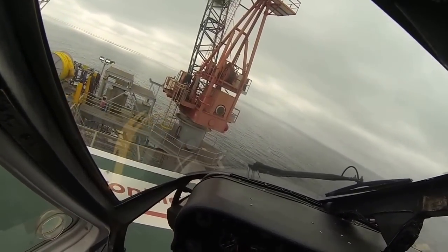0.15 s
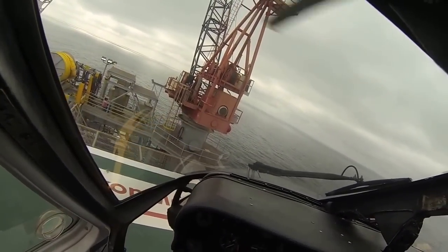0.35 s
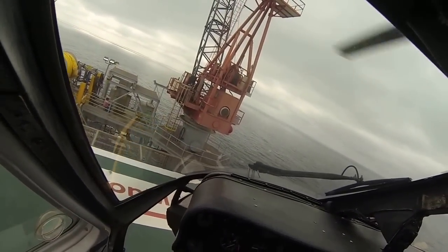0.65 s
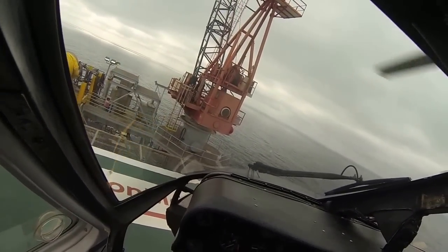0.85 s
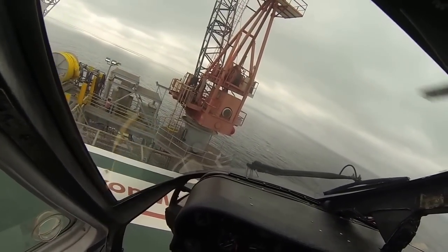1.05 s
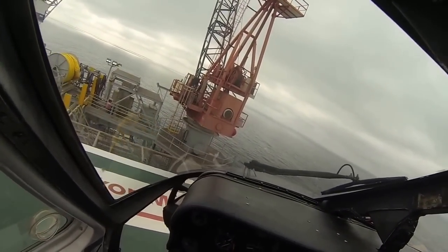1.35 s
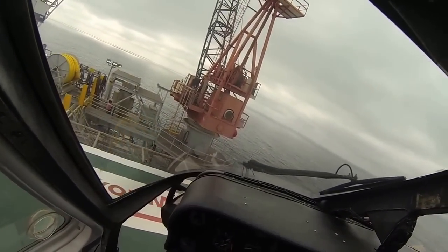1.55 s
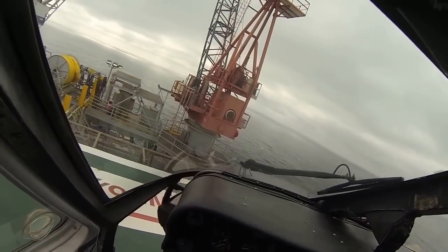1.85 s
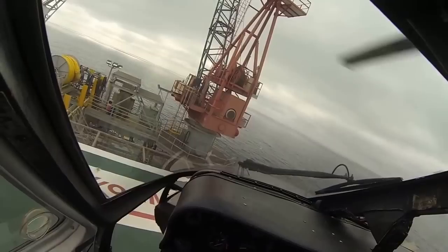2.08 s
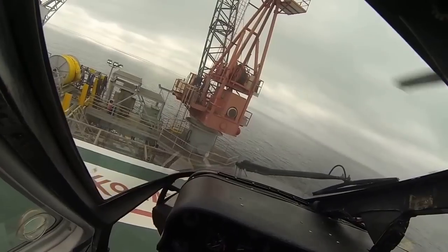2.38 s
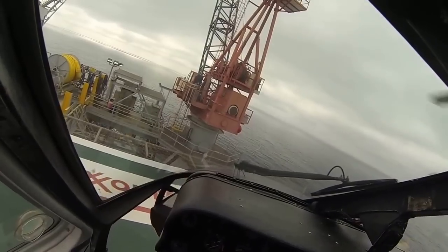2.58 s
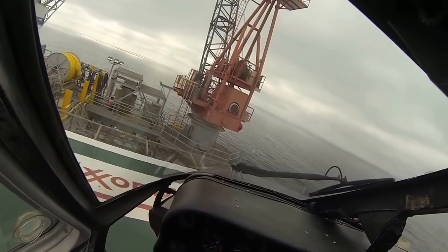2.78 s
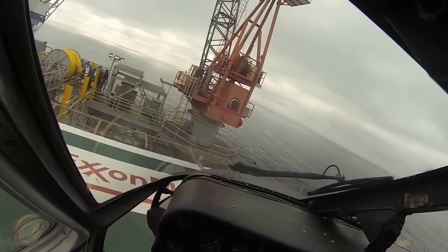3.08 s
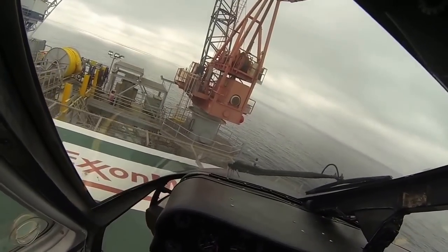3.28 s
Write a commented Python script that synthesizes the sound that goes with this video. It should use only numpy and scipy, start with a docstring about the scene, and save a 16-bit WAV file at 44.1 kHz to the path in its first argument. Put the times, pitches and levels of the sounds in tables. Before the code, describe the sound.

A helicopter drones steadily inside its cockpit for about 3.4 seconds, without starting or stopping. A loud, pure gearbox whine rises very slightly until 2 s, then holds, quivering with the rotor over lower gear hums. Deep buffeting swells unevenly, strongest near 1.3 s, beneath boomy cabin noise and ringing panels. A thin, faint turbine whistle sits on top. Soft sizzles come and go; small dry ticks cluster around 1.8-2.3 s and near the end.

```python
"""Inside the cockpit of a helicopter hovering by an offshore deck. The main gearbox whines in pure tones
that throb with the rotor. Shaped noise makes the cabin boom, the deep buffeting and the ringing panels,
and a narrow, wavering band of noise makes the thin turbine whistle. Now and then the trim ticks (short
fading bursts) and something sizzles faintly with the vibration (soft swells of grainy noise)."""
import sys
import numpy as np
from scipy import signal
from scipy.fft import rfft, irfft
from scipy.io import wavfile

SR = 44100
rng = np.random.default_rng(int(sys.argv[2]) if len(sys.argv) > 2 else 0)


def log_audio(samples):
    """Write samples as a 16-bit WAV file to the path given in sys.argv[1]."""
    # one column per channel
    frames = np.atleast_2d(samples).T
    # limit to full scale, then quantise
    limited = np.clip(frames, -1, 1)
    pcm = np.round(limited * 32767).astype(np.int16)
    wavfile.write(sys.argv[1], SR, pcm)


N = 151263  # length of the sound in samples

# Speed of the drive train, told as the pitch of the loudest gear tone: (time [s], pitch [Hz])
WHINE_PITCH = [(0, 1209), (.4, 1212.6), (.85, 1214.5), (1.4, 1217.3), (2.05, 1221.3), (2.5, 1220),
               (3.43, 1220.2)]
# Loudness of that tone: (time [s], level [dB])
WHINE_LEVEL = [(0, -24), (.8, -26), (1.3, -25), (1.9, -23), (2.6, -25.6), (3.4, -26)]
# Shafts that make it throb: (rate [Hz at normal speed], depth [0-1])
WHINE_THROB = [(9.7, .12), (19.4, .06), (38.6, .1), (71.6, .14)]
# Harmonics of the main gear mesh; a negative fade makes a harmonic quietest at its turning time:
# (multiple, level at the turn [dB], turning time [s], fade either side [dB per s], throb [0-1])
MESH_HARMONICS = [(1, -39.5, 0.97, 2.53, 0.23), (2, -36.5, 3.9, 0.5, 0.2), (3, -39.5, 2.4, 3, 0.03),
                  (4, -46, 1.8, -0.1, .13), (5, -49.5, 0.33, 1.1, 0.2), (6, -55, 2.74, 3, 0.2),
                  (7, -88, 1.7, -4, 0.3), (8, -66.5, .6, 3, 0)]
# Extra level of one mesh harmonic, which dips and then flares: (time [s], level [dB])
FLARE_LEVEL = [(0, -0.5), (.55, 1.5), (.7, -5), (.9, -1), (.96, 3.5), (1.5, 3), (1.95, -1.5), (3.43, 1.5)]
# Other gears, pumps and shafts: (pitch [Hz at normal speed], level [dB])
ACCESSORY_TONES = [(107.6, -35), (131.2, -33), (467, -50.5), (882.6, -53), (1290, -44), (1570.5, -41),
                   (1944, -49), (2151, -49.5), (2437.5, -56), (2649, -51.5), (2745, -59), (3726, -55.5),
                   (4446, -65.5), (6094, -71), (7946, -87)]
# Thump of the blades: (multiple of the blade rate, level [dB])
BLADE_THUMP = [(.5, -29.5), (1, -42), (2, -43), (3, -37.5), (4, -49)]
# Tone colour of the airframe's deep buffeting: (frequency [Hz], relative level [dB])
BUFFET_COLOUR = [(12, -47.5), (24, -51.5), (39, -41.5), (49, -53), (57, -44), (68, -63), (77, -47.5),
                 (88, -62.5)]
# Loudness of the buffeting: (time [s], level [dB])
BUFFET_LEVEL = [(0, -23.5), (.2, -28.5), (.38, -24.5), (.7, -31.5), (1.1, -28), (1.3, -21), (1.5, -40.5),
                (1.7, -25.5), (1.9, -31), (2.3, -28), (2.58, -24), (2.9, -30.5), (3.2, -25), (3.43, -38)]
# Tone colour of the booming cabin air: (frequency [Hz], relative level [dB])
BOOM_COLOUR = [(92, -61), (103, -46), (114, -49), (126, -49.5), (142, -52), (162, -48.5), (190, -53.5),
               (212, -51.5), (235, -57), (310, -58), (390, -64), (490, -62.5), (560, -67.5), (680, -69.5),
               (735, -67), (850, -71.5), (1050, -76), (1400, -118)]
# Tone colour of the panels shaken by the gearbox: (frequency [Hz], relative level [dB])
PANEL_COLOUR = [(950, -91.5), (1110, -74.5), (1190, -62), (1250, -53.5), (1330, -59.5), (1400, -65.5),
                (1480, -56.5), (1620, -60), (1850, -71.5), (2030, -71), (2100, -70), (2330, -70),
                (2420, -78.5), (2580, -78), (2750, -77.5), (3000, -74), (3300, -81), (3800, -84),
                (4250, -86.5), (4700, -90.5), (5170, -83.5), (5900, -96), (7400, -96), (9800, -99.5),
                (11800, -109), (14200, -113)]
# Bursts of sizzle: (centre [s], reach either side [s], level [dB])
SIZZLES = [(.135, 0.04, -53), (.29, .05, -58), (0.342, 0.043, -45.5), (.41, .04, -49), (.51, 0.061, -48),
           (1.18, .09, -53), (1.33, 0.05, -49), (1.694, 0.099, -54), (1.832, .05, -62), (2.2, .035, -46.5),
           (2.266, 0.033, -54), (2.34, .02, -51), (2.37, 0.023, -48), (2.416, .022, -49),
           (2.513, .016, -47), (2.615, 0.014, -48), (2.703, 0.086, -53), (3.011, .025, -44.5),
           (3.065, 0.043, -54), (3.13, .02, -54), (3.41, .03, -59)]
# Tone colour of the sizzle: (frequency [Hz], relative level [dB])
SIZZLE_COLOUR = [(2500, 0), (5500, 0), (8000, -9.5), (11000, -8), (14500, -16)]
# Ticks of the trim: (start [s], level [dB])
TICKS = [(.0603, -45), (1.8165, -36.5), (1.954, -41), (1.968, -45), (2.0178, -43), (2.2755, -39),
         (3.3498, -40), (3.403, -41.5)]
# Tone colour of the ticks: (frequency [Hz], relative level [dB])
TICK_COLOUR = [(1500, -13), (2800, -4), (3800, 7), (4500, -9), (5200, 6.5), (6000, -14), (7000, -12),
               (10000, -25)]

# Pitches and rates at normal speed; all but the turbine's pitch follow the drive train.
WHINE_HZ, ROTOR_HZ, MESH_HZ = 1219.8, 4.84, 726.4
BLADES = 4
BLADE_HZ = BLADES * ROTOR_HZ
# Flutter is a random change of size (as a fraction); jitter is a random shift of phase.
WHINE_FLUTTER, WHINE_JITTER_RAD = 0.06, 0.08
MESH_FLUTTER, MESH_JITTER_RAD = 0.16, 0.2
MESH_SWING_RAD = 0.12  # phase swing of the first mesh harmonic; higher ones swing more
FLARING_MULTIPLE = 4
TONE_FLUTTER, TONE_JITTER_RAD = 0.2, 0.26
THUMP_FLUTTER, THUMP_JITTER_RAD = 0.36, 0.57
BOOM_DB, BOOM_SURGE_DB, BOOM_SURGE_HZ = -28.5, 0.68, 9.8
PANELS_DB, PANELS_THROB = -31.5, 0.092
PANELS_FOLLOW = 0.32  # dB of panel level for each dB of whine level
TURBINE_HZ, TURBINE_WIDTH_HZ, TURBINE_WAVER_HZ = 10420, 215, 60
TURBINE_DB, TURBINE_THROB = -59, 0.28
SIZZLE_GRAIN_DB, SIZZLE_THROB = 0.5, 0.28
TICK_ATTACK_S, TICK_DECAY_S = 0.001, 0.003
TICK_RING_DB, TICK_RING_S = -5, 0.012
TOP_HZ = 14700


def undb(db):
    """Turn decibels into a gain."""
    return 10 ** (np.asarray(db) / 20)


def unit(x):
    """Scale to an rms (average strength) of 1."""
    return x / np.sqrt(np.mean(x ** 2))


def curve(rows):
    """Join (time, value) rows by straight lines."""
    times, values = np.array(rows).T
    return np.interp(np.arange(N) / SR, times, values)


def noise(colour):
    """Noise of rms 1 shaped by (frequency, level) points, falling steeply outside them."""
    f = np.maximum(np.arange(N // 2 + 1) * SR / N, 1)
    hz, db = np.array(sorted(colour)).T
    shape = undb(np.interp(np.log(f), np.log(hz), db))
    ends = np.minimum(f / hz[0], 1) ** 2 * np.minimum(hz[-1] / f, 1) ** 2
    white = rfft(rng.standard_normal(N))
    return unit(irfft(white * shape * ends, N))


def walk(rate):
    """Smooth random wandering of rms 1, moving up to about rate times a second."""
    f = np.arange(N // 2 + 1) * SR / N
    smoothing = (f > 0) / (1 + (f / rate) ** 2)
    return unit(irfft(rfft(rng.standard_normal(N)) * smoothing, N))


def cycle(clock, hz):
    """A sine locked to the drive train, starting anywhere in its turn."""
    return np.sin(2 * np.pi * (hz * clock + rng.random()))


def tone(clock, hz, flutter, jitter, rate):
    """A tone of rms 1 whose size and phase shake a little."""
    size = 1 + flutter * walk(rate)
    phase = 2 * np.pi * (hz * clock + rng.random()) + jitter * walk(rate)
    return unit(size * np.sin(phase))


def whine(clock):
    """The loudest gear tone: a sine whose size throbs with the rotor and shafts."""
    throb = 1 + sum(depth * cycle(clock, hz) for hz, depth in WHINE_THROB)
    steady = tone(clock, WHINE_HZ, WHINE_FLUTTER, WHINE_JITTER_RAD, rate=20)
    return undb(curve(WHINE_LEVEL)) * unit(throb * steady)


def gearbox(clock):
    """Gear mesh harmonics that sway with the rotor as each blade twists the drive, and steadier tones."""
    t = np.arange(N) / SR
    twisted = clock + MESH_SWING_RAD * cycle(clock, BLADE_HZ) / (2 * np.pi * MESH_HZ)
    out = 0
    for multiple, db, turn, fade, throb in MESH_HARMONICS:
        # one sway for each of the first few multiples of the rotor's turning rate
        sway = 1 + throb * sum(cycle(clock, (j + 1) * ROTOR_HZ) for j in range(BLADES))
        teeth = tone(twisted, multiple * MESH_HZ, MESH_FLUTTER, MESH_JITTER_RAD, rate=50)
        flare = curve(FLARE_LEVEL) if multiple == FLARING_MULTIPLE else 0
        level = db - fade * np.abs(t - turn) + flare
        out = out + undb(level) * unit(sway * teeth)
    for hz, db in ACCESSORY_TONES:
        out = out + undb(db) * tone(clock, hz, TONE_FLUTTER, TONE_JITTER_RAD, rate=7.6)
    return out


def rotor(clock):
    """Uneven blade thump from low tones; downwash buffeting and surging cabin boom from noise."""
    thump = 0
    for multiple, db in BLADE_THUMP:
        beat = tone(clock, multiple * BLADE_HZ, THUMP_FLUTTER, THUMP_JITTER_RAD, rate=5.2)
        thump = thump + undb(db) * beat
    buffet = undb(curve(BUFFET_LEVEL)) * noise(BUFFET_COLOUR)
    boom_level = BOOM_DB + BOOM_SURGE_DB * walk(BOOM_SURGE_HZ)
    return thump + buffet + undb(boom_level) * noise(BOOM_COLOUR)


def panels(clock):
    """Dense ringing of panels: noise that partly follows the whine and swells at each blade pass."""
    drive = curve(WHINE_LEVEL)
    level = PANELS_DB + PANELS_FOLLOW * (drive - drive.mean())
    swell = 1 + PANELS_THROB * cycle(clock, BLADE_HZ)
    return undb(level) * swell * noise(PANEL_COLOUR)


def turbine(clock):
    """A compressor whistle: narrow noise that wavers quickly in pitch and is chopped by the blades."""
    pitch = TURBINE_HZ + TURBINE_WAVER_HZ * walk(rate=34)
    phase = 2 * np.pi * np.cumsum(pitch) / SR
    # two random sizes, a quarter turn apart, spread the tone into a narrow band
    whistle = unit(walk(TURBINE_WIDTH_HZ) * np.cos(phase) + walk(TURBINE_WIDTH_HZ) * np.sin(phase))
    chop = 1 + TURBINE_THROB * cycle(clock, BLADE_HZ)
    return undb(TURBINE_DB) * whistle * chop


def sizzle(clock):
    """Short soft swells of grainy noise, shaken at the blade rate."""
    t = np.arange(N) / SR
    swell = sum(undb(db) * np.exp(-2 * ((t - centre) / reach) ** 2) for centre, reach, db in SIZZLES)
    shake = 1 + SIZZLE_THROB * cycle(clock, BLADE_HZ)
    grain = undb(SIZZLE_GRAIN_DB * walk(rate=600))
    return swell * unit(shake * noise(SIZZLE_COLOUR) * grain)


def trim_ticks():
    """Dry ticks of the trim: noise that starts sharply, drops fast and rings on briefly."""
    t = np.arange(N) / SR
    knocks = 0
    for start, db in TICKS:
        age = np.maximum(t - start, 0)
        attack = np.minimum(age / TICK_ATTACK_S, 1)
        fall = np.exp(-age / TICK_DECAY_S)
        ring = undb(TICK_RING_DB) * np.exp(-age / TICK_RING_S)
        knocks = knocks + undb(db) * attack * (fall + ring)
    return knocks * noise(TICK_COLOUR)


def scene():
    """Add all the layers; one drive-train clock sets the gear tones and the rotor's rhythm."""
    # the clock counts seconds, running faster or slower with the drive train
    clock = np.cumsum(curve(WHINE_PITCH) / WHINE_HZ) / SR
    machinery = whine(clock) + gearbox(clock) + rotor(clock)
    cabin = panels(clock) + turbine(clock) + sizzle(clock) + trim_ticks()
    return (machinery + cabin)[None]


def record(dry):
    """Cut the top of the treble with a steep low-pass filter."""
    low_pass = signal.ellip(8, 0.2, 70, TOP_HZ, fs=SR, output="sos")
    return signal.sosfilt(low_pass, dry)


dry = scene()
out = record(dry)
log_audio(out)
```